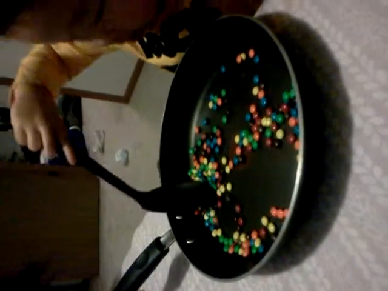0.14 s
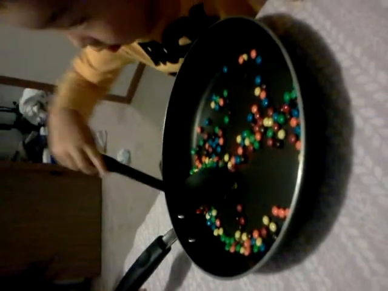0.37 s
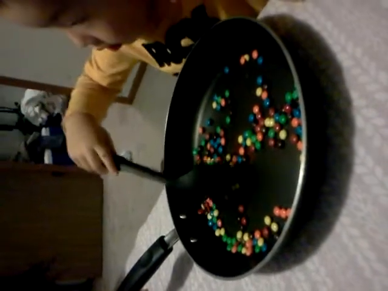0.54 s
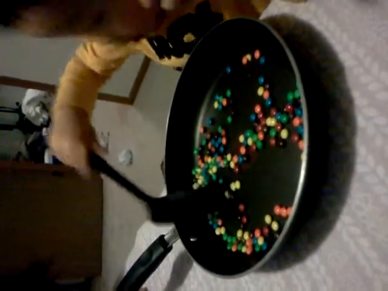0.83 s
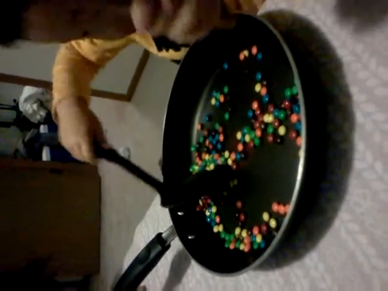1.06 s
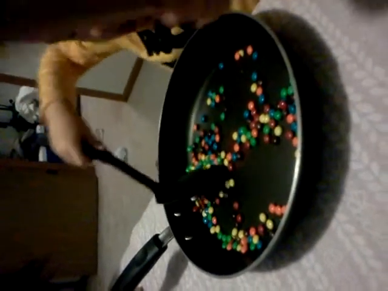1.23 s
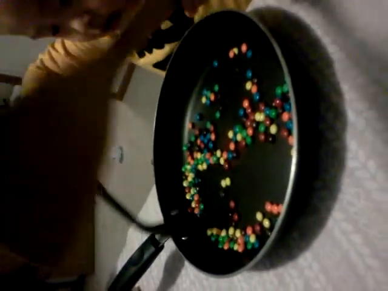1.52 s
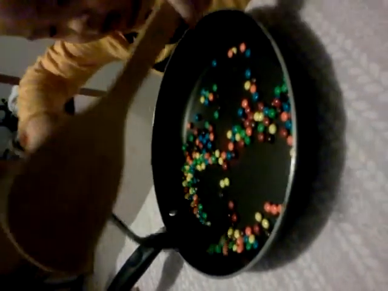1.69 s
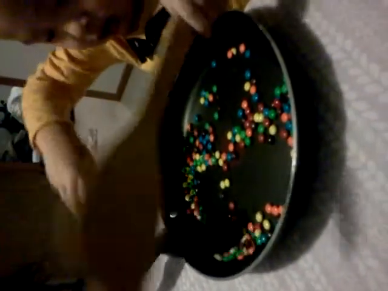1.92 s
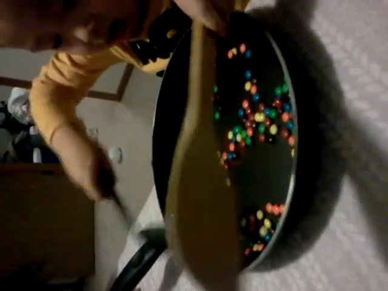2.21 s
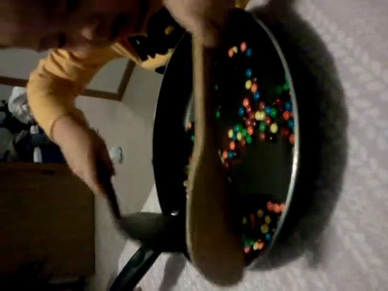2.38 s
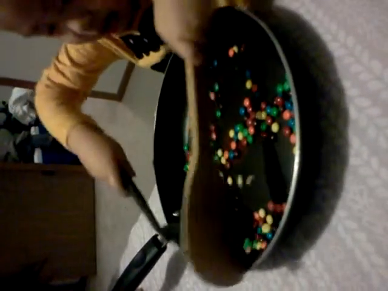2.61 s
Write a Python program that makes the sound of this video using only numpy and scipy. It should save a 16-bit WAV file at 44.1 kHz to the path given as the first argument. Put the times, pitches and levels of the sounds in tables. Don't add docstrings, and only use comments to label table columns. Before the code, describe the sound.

Candies rattle in a pan, stirred briefly, then near silence; a sharp tap sets the pan humming and stirring resumes, fades, and a wooden spoon knocks loudly, then lightly. Close, narrow-band microphone in a small live room.

```python
import sys
import numpy as np
from scipy import signal
from scipy.fft import rfft, irfft, next_fast_len
from scipy.io import wavfile
from scipy.ndimage import map_coordinates

SR = 44100
rng = np.random.default_rng(int(sys.argv[2]) if len(sys.argv) > 2 else 0)


def field_ratio(decibels):
    return 10 ** (np.asarray(decibels, dtype=float) / 20)


def transcribe(signal):
    frames = np.atleast_2d(signal).T
    limited = np.clip(frames, -1, 1)
    pcm = np.round(limited * 32767).astype(np.int16)
    wavfile.write(sys.argv[1], SR, pcm)


N = 121275


def unit(x):
    return x / np.sqrt(np.mean(x ** 2) + 1e-20)


def along(points, hz):
    f, v = np.transpose(points)
    return np.interp(np.log(hz + 1), np.log(f + 1), v)


def wobble(rate):
    knots = rng.standard_normal(int(N * rate / SR) + 4)
    return map_coordinates(knots, [np.arange(N) * rate / SR])


def coloured(x, points):
    m = next_fast_len(N + 8192)
    gain = field_ratio(along(points, np.fft.rfftfreq(m, 1 / SR)))
    return irfft(rfft(x, m) * gain, m)[:N]


def pings(s, db, hz, t60, rise, size, lag=0):
    s, db, hz, t60 = (np.reshape(v * np.ones(len(s)), (-1, 1)) for v in (s, db, hz, t60))
    k = np.arange(size)
    t = k / SR
    envelope = field_ratio(db - 60 * t / t60) * (1 - np.exp(-t / rise))
    wave = envelope * np.sin(2 * np.pi * hz * (t - lag))
    place = np.round(np.abs(s) * SR).astype(int) + k
    return np.bincount(place.ravel(), wave.ravel(), N + size)[:N]


def struck(s, db, modes, scatter_db, lag=0):
    hz, level_db, t60 = np.transpose(modes)
    each = np.add.outer(db, level_db) + scatter_db * rng.standard_normal((len(s), len(hz)))
    return pings(np.repeat(s, len(hz)), each.ravel(), np.tile(hz, len(s)), np.tile(t60, len(s)),
                 rise=0.00051, size=8000, lag=lag)


def click(s, db, hz, dull_db, luck):
    t60, rise = 0.0105, 0.00053
    ring = pings(s, db + 4, hz, t60 * np.exp(.12 * luck[0]), rise, size=400)
    upper_ring = pings(s, db - 3.5, 3224 * np.exp(0.06 * luck[1]), t60, rise, size=400)
    crack = pings(s, db - 10.5, 4104 * np.exp(0.075 * luck[0]), 0.0023, .0001, size=100)
    dull = pings(s, db + dull_db + 10.5, 1090 * np.exp(0.41 * luck[2]), 0.0066, 0.00019, size=300)
    return ring + upper_ring + crack + dull


# (t/s, peak level/dB, f/Hz, dull part #
# level/dB)
CLEAR_CLICKS = [(0.004, -29.0, 2230.0, -22.0), (0.0294, -37.0, 2030.0, -33.0),
                (0.1249, -32.0, 2550.0, -28.0), (0.1525, -37.0, 2530.0, -28.0),
                (0.1824, -28.0, 2580.0, -38.0), (0.1903, -32.0, 2690.0, -32.0),
                (0.1946, -31.0, 2540.0, -32.0), (0.1988, -33.0, 2520.0, -31.0),
                (0.2075, -31.0, 2670.0, -23.0), (0.2323, -30.0, 2570.0, -32.0),
                (0.2445, -33.0, 2580.0, -28.0), (0.2562, -32.0, 2650.0, -32.0),
                (0.272, -34.0, 2570.0, -25.0), (0.301, -31.0, 3290.0, -21.0),
                (0.3079, -33.0, 2580.0, -17.0), (0.3428, -31.0, 2630.0, -28.0),
                (0.3511, -37.0, 2650.0, -26.0), (0.3552, -37.0, 2670.0, -26.0),
                (0.4744, -35.0, 2630.0, -19.0), (0.4831, -42.0, 3070.0, -20.0),
                (0.4872, -41.0, 2780.0, -22.0), (0.4983, -36.0, 2810.0, -16.0),
                (0.5063, -36.0, 2870.0, -18.0), (0.5112, -40.0, 2770.0, -26.0),
                (0.515, -43.0, 2970.0, -19.0), (0.5592, -47.0, 2130.0, -22.0),
                (1.2539, -24.0, 2840.0, -22.0), (1.261, -9.0, 2720.0, -29.0),
                (1.2661, -22.0, 2670.0, -14.0), (1.2752, -21.0, 2730.0, -21.0),
                (1.2961, -29.0, 2010.0, -11.0), (1.3778, -22.0, 2680.0, -20.0),
                (1.3813, -21.0, 3130.0, -24.0), (1.3867, -19.0, 3030.0, -26.0),
                (1.3936, -21.0, 2910.0, -28.0), (1.3987, -17.0, 2790.0, -31.0),
                (1.4314, -24.0, 2810.0, -25.0), (1.4697, -26.0, 2680.0, -36.0),
                (1.4964, -29.0, 2720.0, -28.0), (1.5046, -27.0, 2720.0, -32.0),
                (1.5202, -26.0, 2990.0, -41.0), (1.5241, -30.0, 2900.0, -32.0),
                (1.5283, -29.0, 2690.0, -32.0), (1.5381, -28.0, 2890.0, -38.0),
                (1.5757, -29.0, 2780.0, -32.0), (1.5813, -33.0, 2700.0, -38.0),
                (1.6716, -33.0, 2750.0, -34.0), (1.6803, -32.0, 2680.0, -27.0),
                (1.6872, -22.0, 3150.0, -28.0), (1.7007, -26.0, 2640.0, -28.0),
                (1.7094, -29.0, 3240.0, -26.0), (1.7321, -27.0, 2670.0, -26.0),
                (1.7505, -29.0, 2970.0, -26.0), (1.7571, -29.0, 2700.0, -29.0),
                (1.7843, -34.0, 2690.0, -24.0), (1.7954, -36.0, 2920.0, -20.0),
                (1.8029, -37.0, 2960.0, -21.0), (1.8224, -39.0, 2850.0, -24.0),
                (1.8602, -40.0, 2800.0, -20.0), (1.8681, -41.0, 2920.0, -18.0),
                (1.8715, -40.0, 3040.0, -23.0), (1.8812, -37.0, 2990.0, -32.0),
                (1.8869, -41.0, 2770.0, -21.0), (1.9007, -39.0, 2820.0, -32.0),
                (1.9201, -41.0, 2700.0, -20.0), (1.9438, -33.0, 2870.0, -20.0),
                (1.9506, -35.0, 2900.0, -26.0), (1.9604, -27.0, 2970.0, -40.0),
                (1.9666, -27.0, 2710.0, -12.0), (1.9738, -29.0, 2930.0, -19.0),
                (1.9782, -27.0, 2780.0, -17.0), (1.9861, -33.0, 2970.0, -16.0),
                (1.9904, -34.0, 2730.0, -12.0), (2.0036, -30.0, 2760.0, -28.0),
                (2.0157, -38.0, 2510.0, -22.0), (2.0411, -42.0, 2660.0, -17.0),
                (2.1298, -39.0, 2960.0, -27.0), (2.1361, -38.0, 2980.0, -33.0),
                (2.1426, -41.0, 2830.0, -21.0), (2.1566, -42.0, 3000.0, -20.0),
                (2.1676, -43.0, 3050.0, -26.0), (2.1984, -36.0, 2750.0, -28.0),
                (2.2109, -46.0, 2490.0, -23.0), (2.2679, -51.0, 3030.0, -15.0),
                (2.2923, -50.0, 3070.0, -19.0), (2.5025, -18.0, 2720.0, -18.0),
                (2.5366, -24.0, 2670.0, -19.0), (2.5421, -25.0, 1830.0, -18.0),
                (2.5606, -22.0, 2700.0, -18.0), (2.5753, -27.0, 3100.0, -25.0),
                (2.5854, -28.0, 2690.0, -21.0), (2.5955, -24.0, 3170.0, -20.0),
                (2.607, -30.0, 1970.0, -21.0), (2.6229, -26.0, 2780.0, -22.0),
                (2.6559, -24.0, 2810.0, -29.0), (2.6628, -29.0, 2730.0, -27.0),
                (2.6696, -29.0, 3030.0, -22.0), (2.6892, -22.0, 1740.0, -16.0),
                (2.6948, -24.0, 2610.0, -14.0), (2.7079, -30.0, 2810.0, -17.0)]
# (t/s, peak level/dB, f/Hz, dull part level/dB)
BURST_CLICKS = [
    (1.4104, -26, 2300, -21),
    (2.4222, -27, 2900, -12),
    (2.4238, -6, 2930, -28),
    (2.428, -11, 2850, -24),
    (2.4335, -22, 2900, -20),
    (2.4385, -20, 2900, -20),
    (2.4555, -17, 3000, -20),
    (2.458, -15, 3100, -18),
    (2.4658, -11, 2700, -20),
]


def clear_clicks():
    s, db, hz, dull_db = np.transpose(CLEAR_CLICKS + BURST_CLICKS)
    return click(s, db + 2.01, hz, dull_db, rng.standard_normal((len(s), 3)).T)


# (t/s, rattle level/dB, scrape over rattle level/dB, rattle f/Hz)
STIRRING = [(0, -44, 5, 2700), (.12, -65, -13, 2440), (.13, -47, -6, 2688), (0.339, -46.5, -10, 2563),
            (0.409, -67, -4, 2194), (.5, -56, -5, 2860), (0.569, -60.5, -11.5, 2110),
            (.78, -71, -9.5, 2100), (1.248, -73.5, 6.5, 2767), (1.26, -32.5, -2.5, 2980),
            (1.33, -54, 7.5, 2946), (1.39, -34, -14, 2968), (1.468, -42.5, -27.5, 2623),
            (1.642, -49, -16.5, 2775), (1.702, -37, -11.5, 2813), (1.84, -54.5, -10, 2963),
            (1.97, -49, -1.5, 2800), (2.33, -71, -6, 3081)]
# (t/s, rattle level/dB, scrape over rattle level/dB, rattle f/Hz)
THROWING = [
    (2.416, -79, -13, 2930),
    (2.427, -24, -2.5, 3070),
    (2.449, -35.5, -6, 2850),
    (2.458, -25, -16, 2870),
    (2.522, -43.5, -1, 2700),
    (2.62, -48, -6.5, 2700),
    (2.645, -50.5, -6, 2700),
    (2.69, -39, 12, 2600),
    (2.75, -51, -9.5, 2500),
]
# (f/Hz, level/dB)
SCRAPE_TONE = [(30, -19), (80, -7.5), (150, -5), (400, 0.5), (800, -1.5), (1500, -1), (3000, -14),
               (5000, -8.5)]


def rattle_and_scrape():
    clicks_per_s, most = 1100, 5000
    luck = rng.standard_normal((most, 5))
    s = np.cumsum(rng.exponential(size=most)) / clicks_per_s
    luck, s = luck[s < N / SR].T, s[s < N / SR]
    at, stir_db, scrape_db, pitch_hz = np.transpose(STIRRING + THROWING)

    hz = np.interp(s, at, pitch_hz) * np.exp(0.11 * luck[3])
    sizes_db = 2.5 * luck[4]
    rattle = unit(click(s, sizes_db, hz, -18.5, luck))

    t = np.arange(N) / SR
    rub = rng.standard_normal(N) * field_ratio(4 * wobble(70) + 4 * wobble(18))
    scrape = unit(coloured(rub, SCRAPE_TONE)) * field_ratio(np.interp(t, at, scrape_db))
    clumped = rattle * field_ratio(0.5 * wobble(40.15))
    return field_ratio(np.interp(t, at, stir_db)) * (clumped + scrape)


# (t/s, level/dB)
SPOON_KNOCKS = [
    (2.4658, -3.5),
    (2.6805, -21),
]
# (f/Hz, level/dB, t60/s)
SPOON_MODES = [(1217, -14, .15), (1744, -14, .1), (1809, -5, .13), (1900, -10, .11), (2280, -18, .09),
               (2515, -17, .1), (2587, -3, .09), (2665, 0, .095)]


def spoon():
    contact_s = .00375
    s, db = np.transpose(SPOON_KNOCKS)
    ring = struck(s, db - 5, SPOON_MODES, scatter_db=.3, lag=contact_s)
    crack = pings(s, db - 12, 700, .005, .0002, size=700)
    return ring + crack


# (t/s, level/dB)
PAN_TAPS = [
    (1.262, -35),
    (1.39, -52),
    (2.466, -36),
]
# (f/Hz, level/dB, t60/s)
PAN_MODES = [(915, -7, 0.15), (1167.5, 5, 0.14), (1950, -6, 0.1), (2078, -1, .06), (2320, -11, 0.12),
             (3450, -3, .05)]
# (t/s, level/dB, f/Hz, t60/s)
PAN_NUDGES = [
    (.02, -49.5, 693, 0.43),
    (.304, -39.5, 607.9, 0.073),
    (1.285, -38.5, 686.6, 0.26),
    (1.735, -44, 532, .07),
    (1.768, -42.5, 448, 0.046),
    (1.795, -44.5, 592, 0.069),
    (1.865, -44.5, 473, 0.043),
    (2.592, -29, 569, 0.037),
]


def pan():
    taps = struck(*np.transpose(PAN_TAPS), PAN_MODES, scatter_db=.3)
    return taps + pings(*np.transpose(PAN_NUDGES), rise=0.0017, size=12000)


# (t/s, level/dB, t60/s)
HUM_STARTS = [
    (0, -39.5, 0.68),
    (.35, -58, 1),
    (1.279, -41, 0.41),
    (1.44, -51, 0.35),
    (2.464, -54.5, 0.092),
]


def hum():
    centre_hz, beat_hz = 272, 21.5
    s, db, t60 = np.transpose(HUM_STARTS)
    upper = pings(s, db, centre_hz + beat_hz / 2, t60, rise=0.00091, size=30000)
    lower = pings(s, db, centre_hz - beat_hz / 2, t60, rise=0.00091, size=30000)
    return upper - lower


# (t/s, level/dB, t60/s)
BUMP_TIMES = [(0, -36, 0.026), (.125, -57, 0.078), (.474, -44.5, 0.041), (1.687, -43.5, .1),
              (1.943, -45.5, 0.023), (0.294, -39.5, 0.15), (.498, -44.5, 0.069), (1.263, -31, 0.13),
              (1.377, -33, 0.18), (1.967, -34, 0.079), (2.424, -26, 0.18), (2.468, -18, 0.14),
              (2.594, -33, 0.036), (2.682, -28.5, 0.042)]
# (f/Hz, level/dB)
BUMP_TONE = [(30, -16.5), (150, -7), (500, -6), (1200, 1), (1900, 7.5), (3000, 5.5), (5000, -13.5)]


def bumps():
    t = np.arange(N) / SR
    shape = sum(field_ratio(db - 60 * np.abs(t - s) / t60) * (t >= s) for s, db, t60 in BUMP_TIMES)
    rough = rng.standard_normal(N) * field_ratio(2 * wobble(150))
    return shape * unit(coloured(rough, BUMP_TONE))


# (f/Hz, t60/s)
ROOM_DECAY = [(200, 0.85), (1000, 0.51), (2500, 0.36), (4000, 0.26)]


def room(x):
    hz, t, z = signal.stft(rng.standard_normal(SR // 2), SR, nperseg=256)
    fade = field_ratio(-60 * t / along(ROOM_DECAY, hz)[:, None])
    tail = signal.istft(z * fade, SR, nperseg=256)[1]
    return signal.fftconvolve(np.pad(x, (130, 0)), tail / np.linalg.norm(tail))[:N]


# (f/Hz, level/dB per Hz)
AIR_TONE = [(25, -17.5), (100, -10), (200, -5), (300, 4.5), (600, -0.5), (1900, -7), (2900, -5),
            (5000, -23.5)]


def air():
    return field_ratio(-62 + wobble(9.0)) * unit(coloured(rng.standard_normal(N), AIR_TONE))


def scene():
    near = clear_clicks() + rattle_and_scrape() + pan() + bumps()
    knocks = spoon()
    background = air()
    wet = room(near + field_ratio(-7) * knocks)
    return (near + knocks + hum() + field_ratio(-10) * wet + background)[None]


def roll_off(x):
    return signal.sosfilt(signal.butter(12, 15750, fs=SR, output="sos"), x)


def record(dry):
    top = signal.butter(6, 3500, fs=SR, output="sos")
    steep_end = signal.butter(16, 4250, fs=SR, output="sos")
    low_cut = signal.butter(1, 40, "high", fs=SR, output="sos")
    x = signal.sosfilt(np.vstack([top, steep_end, low_cut]), dry)
    clip = .715
    x = x / (1 + np.abs(x / clip) ** 60) ** (1 / 60)
    return roll_off(x)


dry = scene()
out = record(dry)
transcribe(out)
```